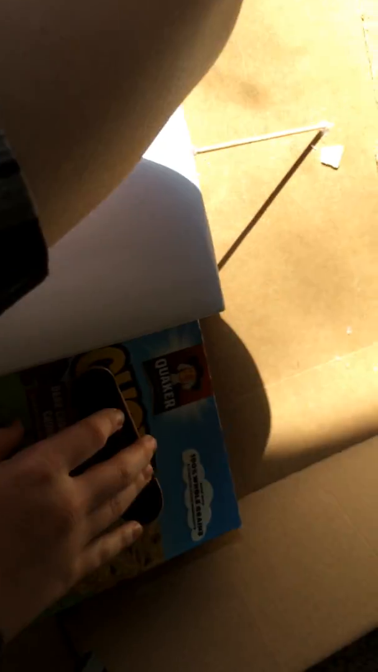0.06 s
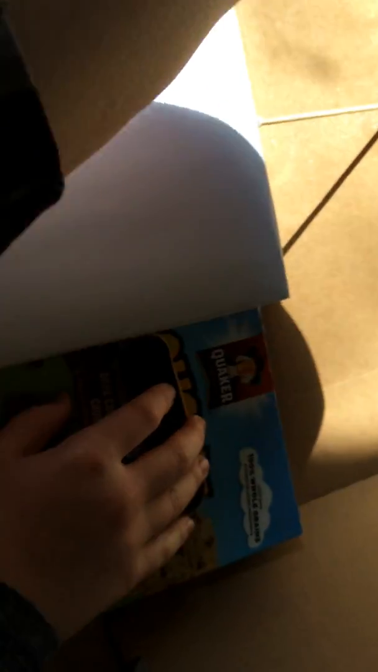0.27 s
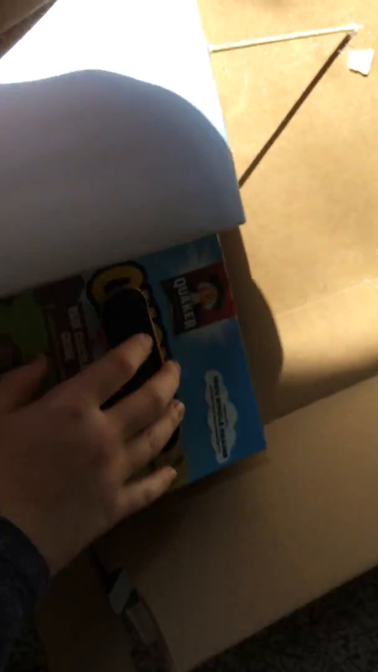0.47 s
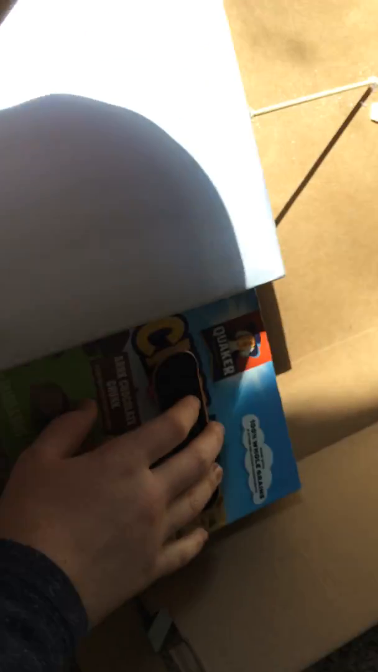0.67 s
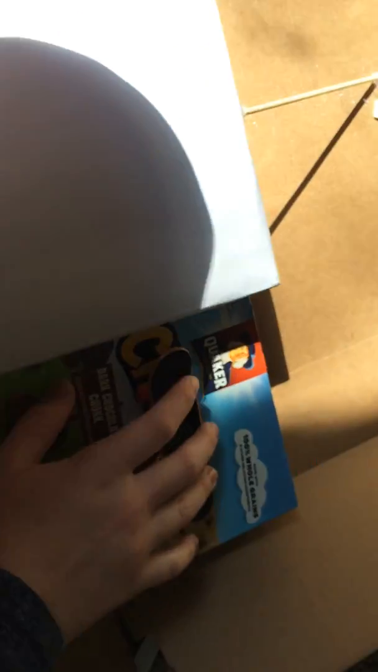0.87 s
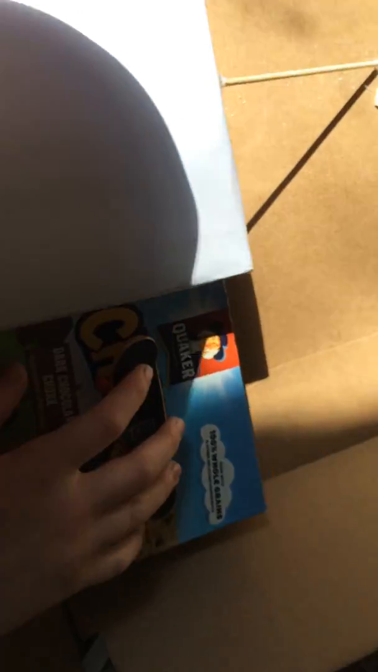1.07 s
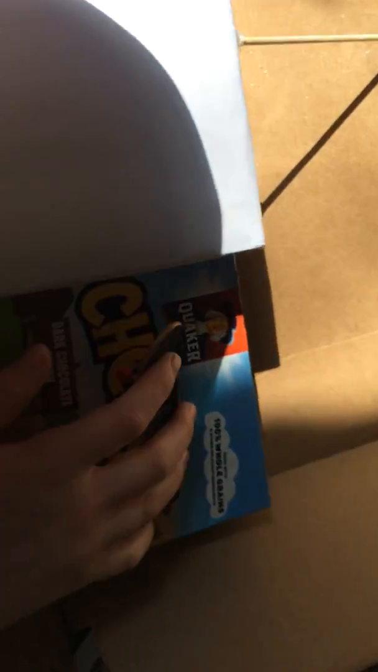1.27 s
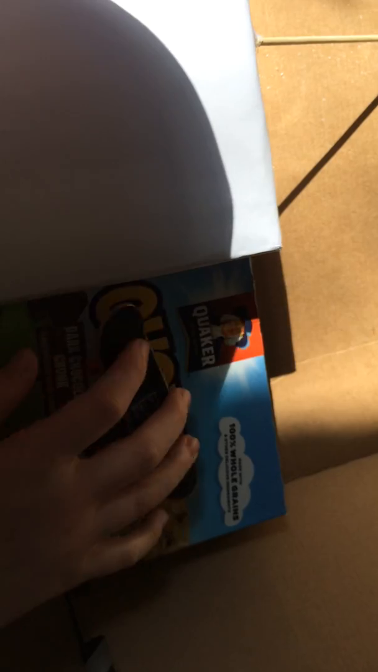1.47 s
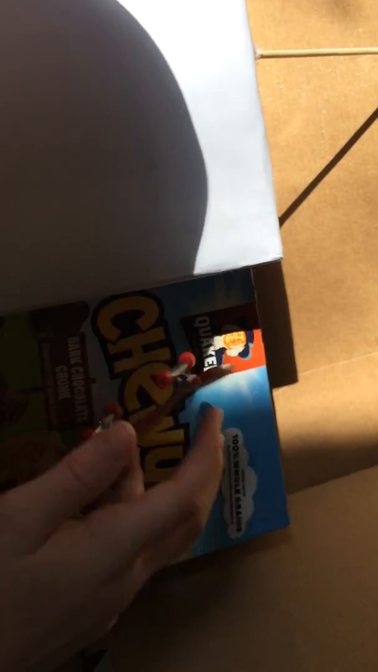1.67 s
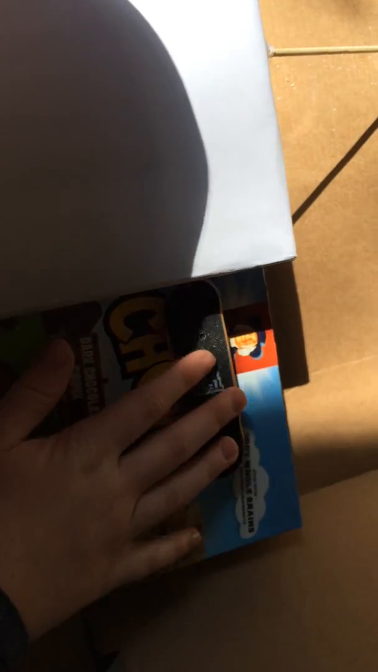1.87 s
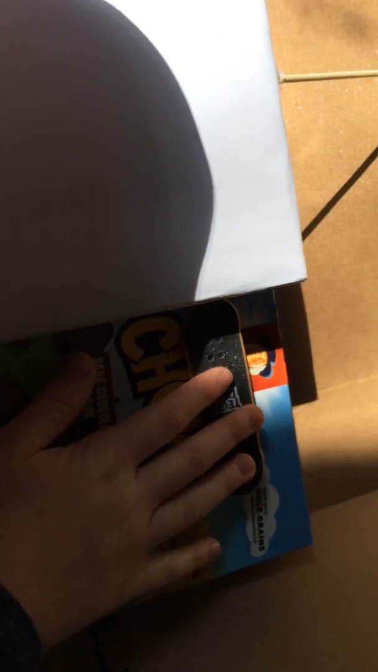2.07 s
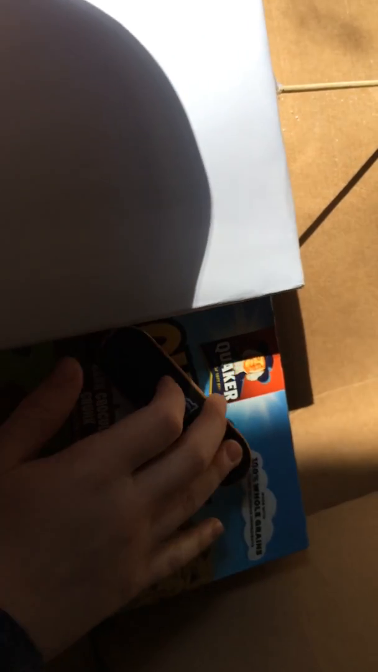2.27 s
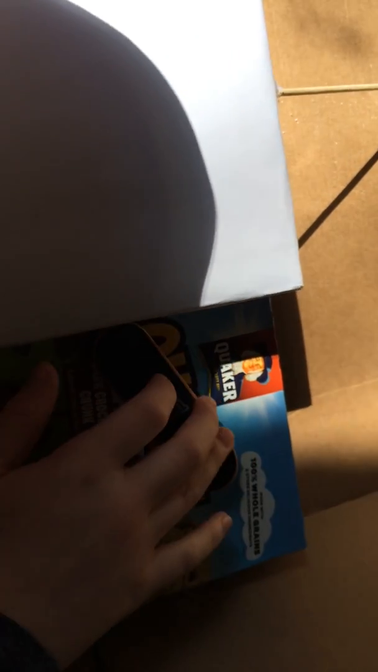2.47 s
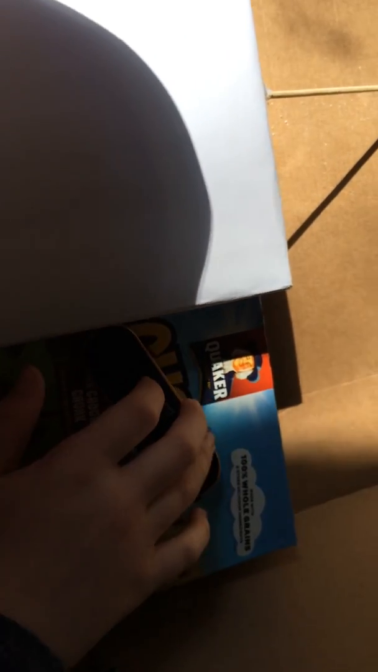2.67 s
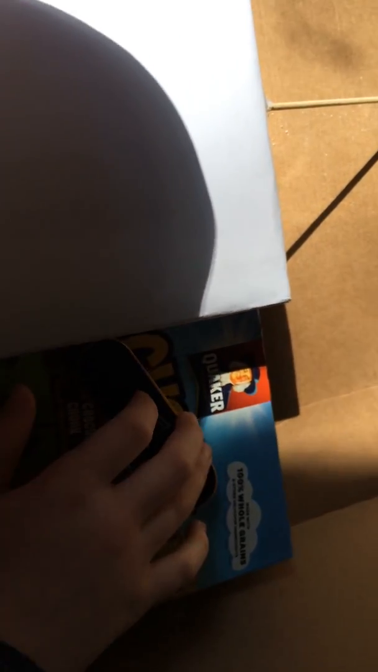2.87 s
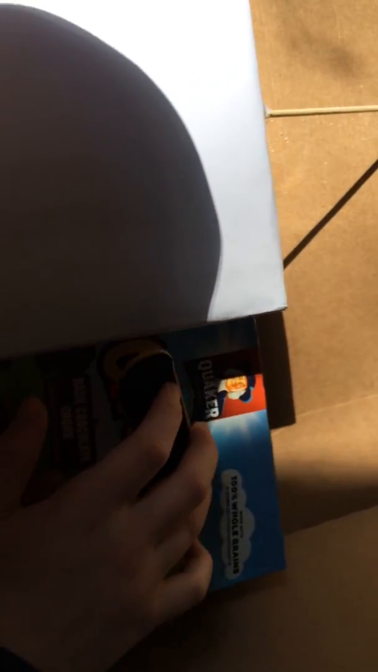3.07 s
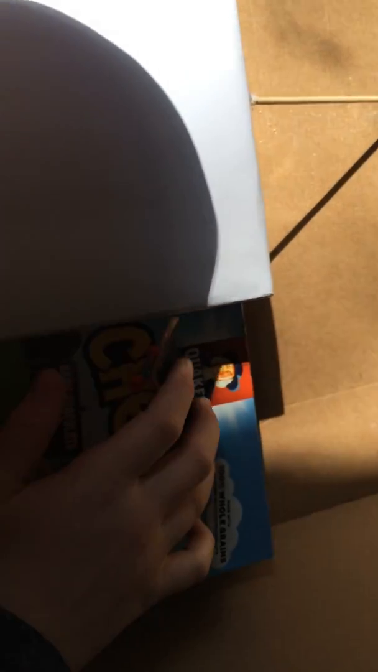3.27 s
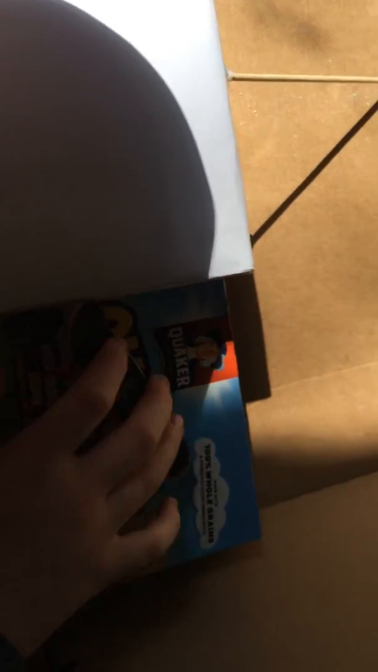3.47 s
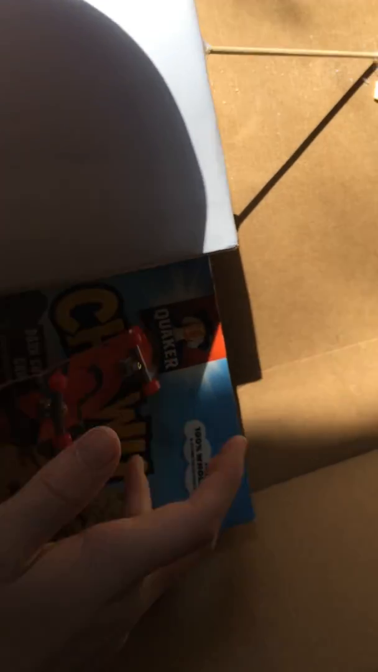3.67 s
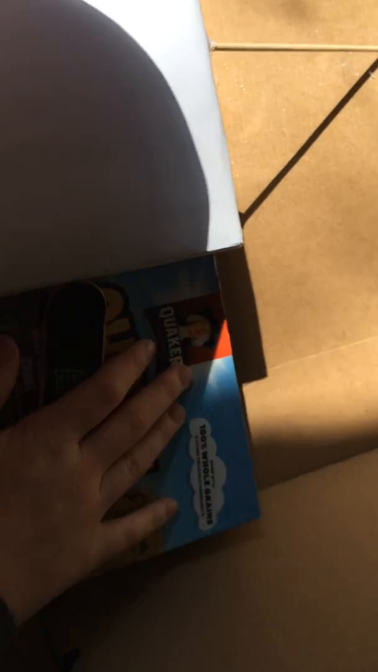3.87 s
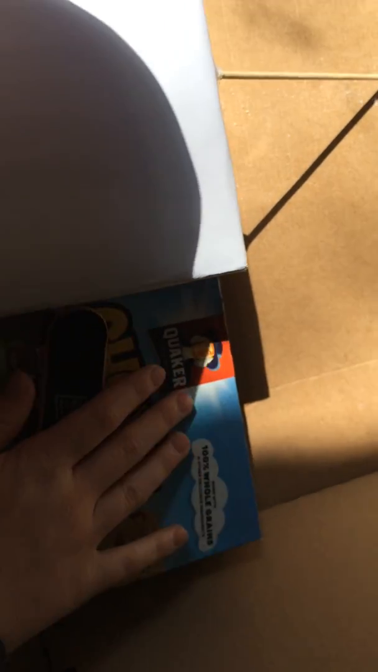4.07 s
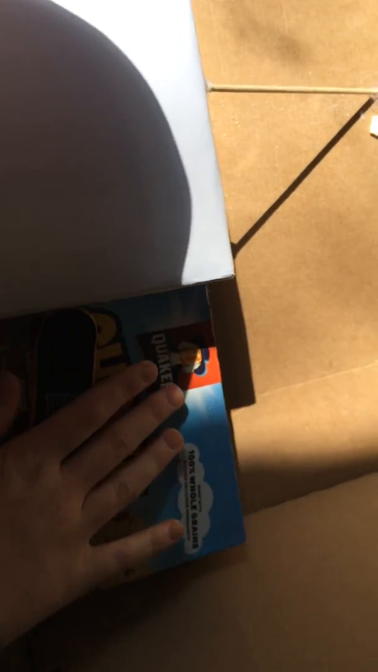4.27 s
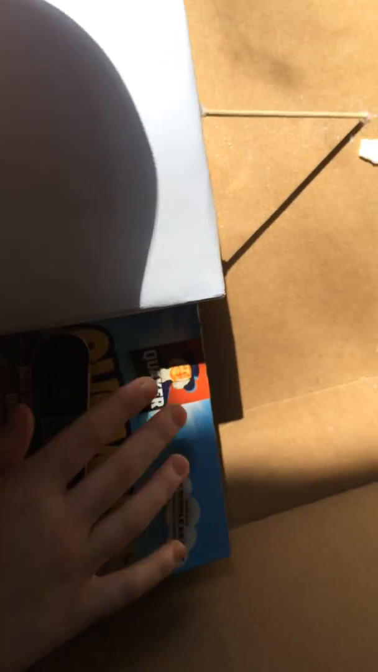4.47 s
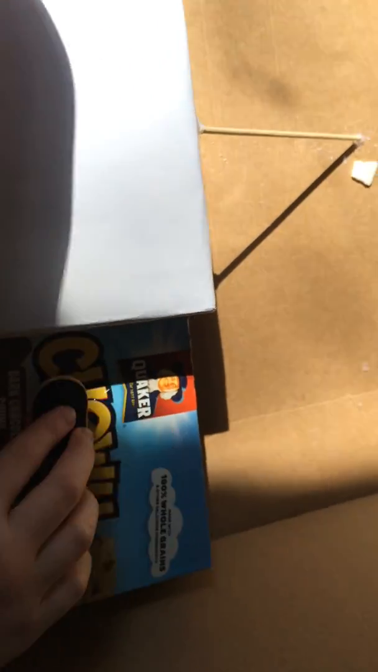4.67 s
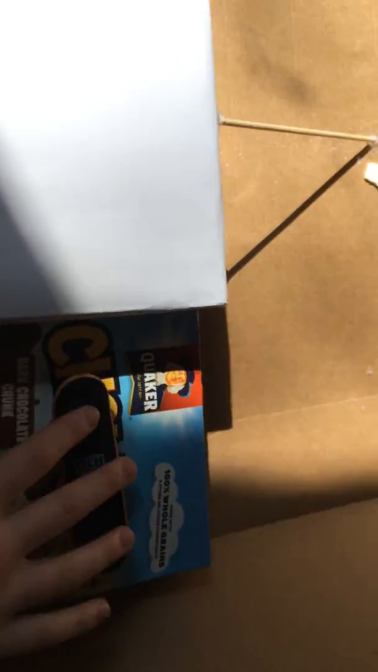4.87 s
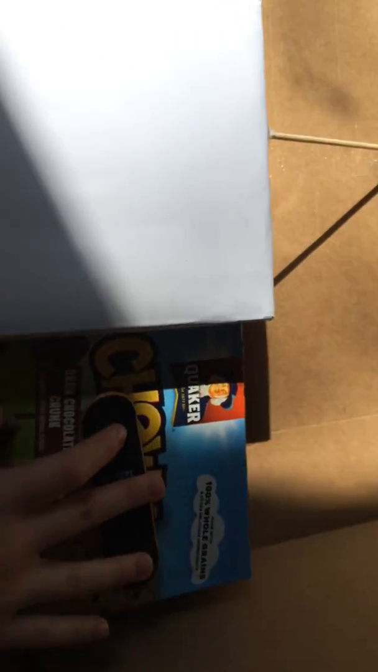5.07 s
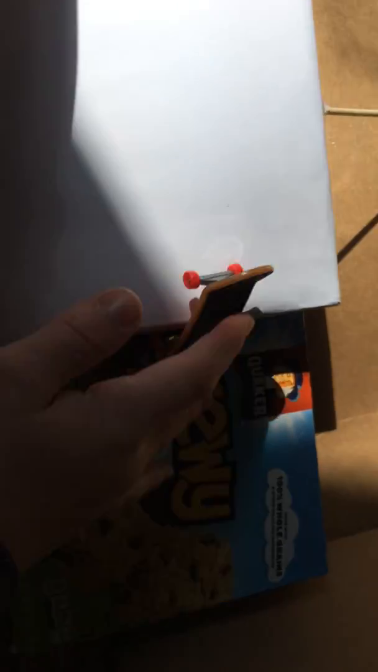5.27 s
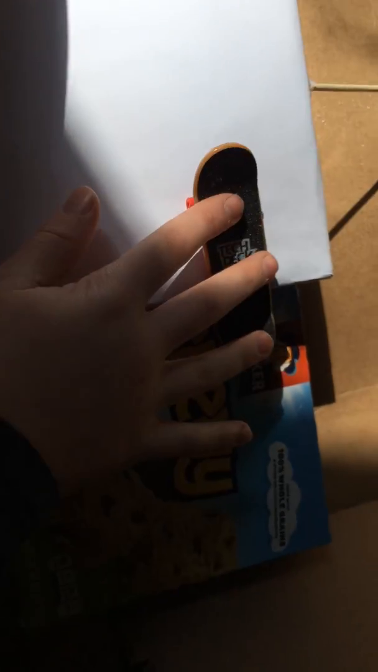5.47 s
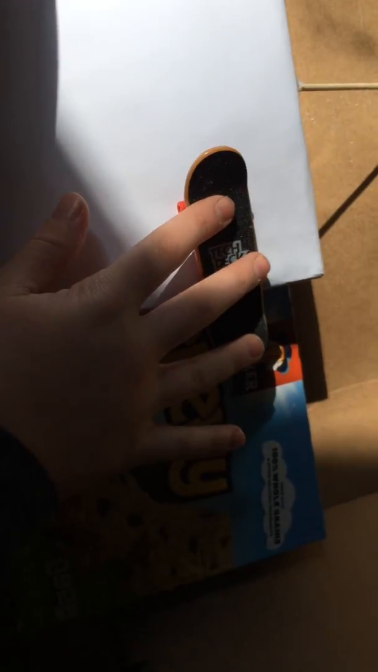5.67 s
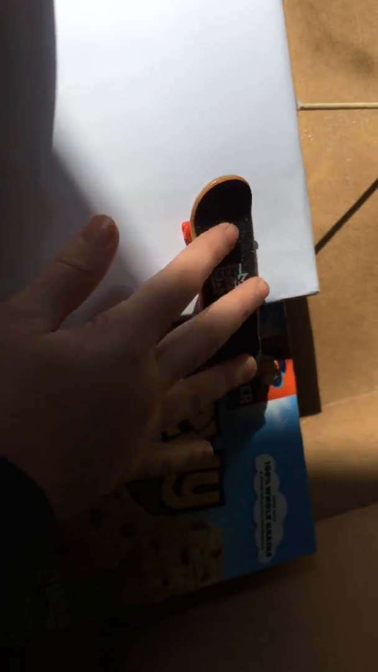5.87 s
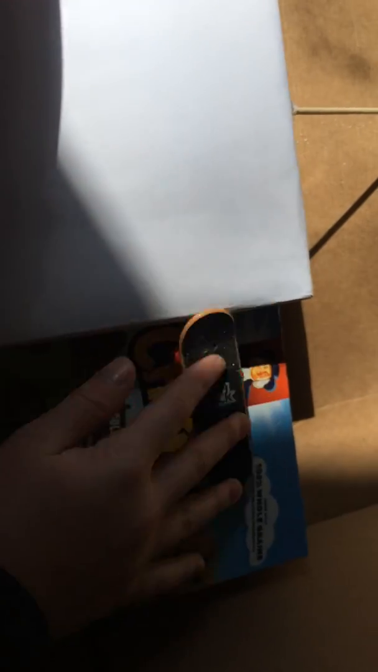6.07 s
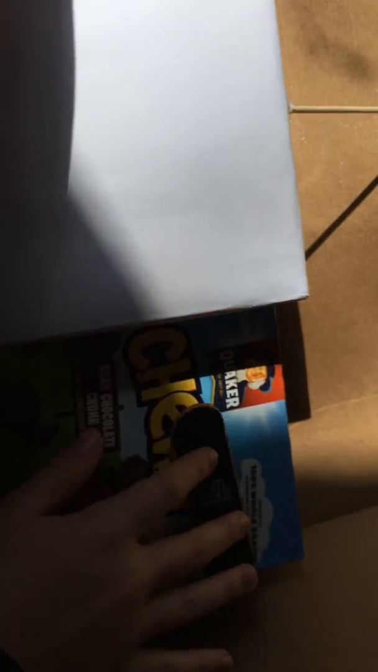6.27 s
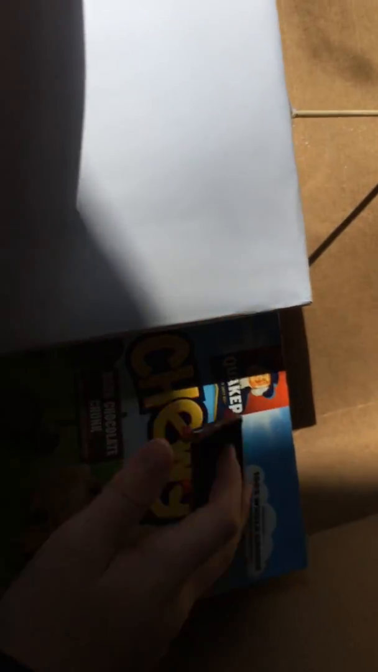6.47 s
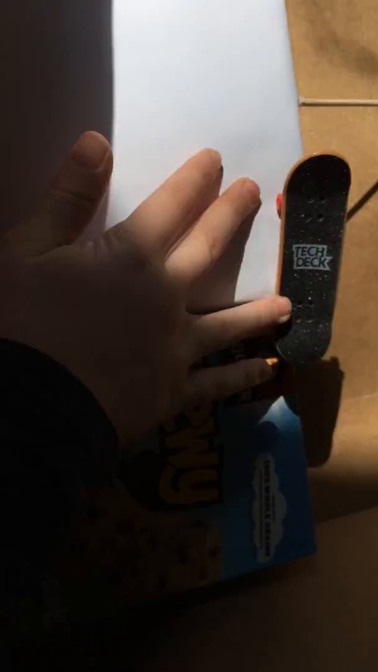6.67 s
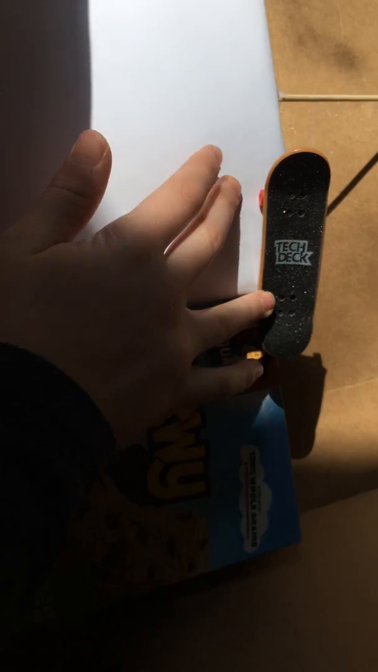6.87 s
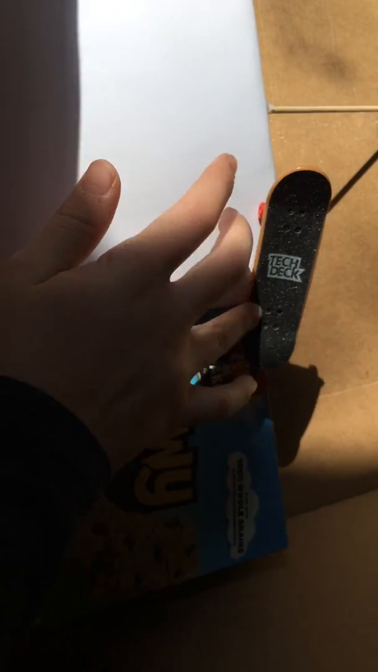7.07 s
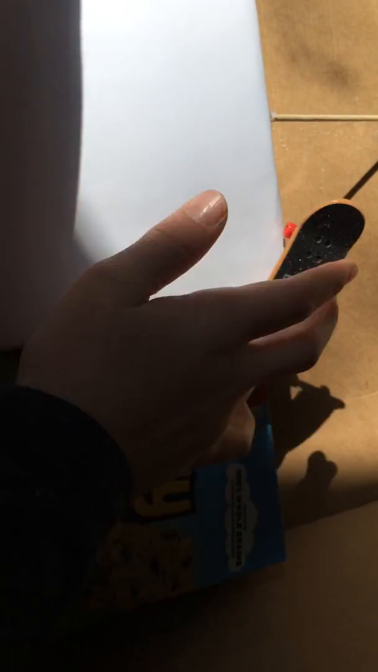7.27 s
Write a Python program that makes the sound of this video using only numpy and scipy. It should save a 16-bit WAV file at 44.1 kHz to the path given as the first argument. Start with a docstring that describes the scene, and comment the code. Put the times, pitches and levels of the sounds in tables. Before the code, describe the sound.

Close, dry phone pickup of a toy skateboard handled on a light hollow box. Three main bouts of knocking: a quick pop and clattering landing, a second similar one, then looser lighter taps with short gritty wheel rolls and a last hard double clack. Between them are near-silent gaps, tiny ticks, soft finger touches, airy sleeve brushing and a faint room hush.

```python
"""A fingerboard is popped, flipped and landed on a flat cardboard box on a table, heard close on a phone.
Each knock is decaying box modes and a flexing spot, with filtered noise and deck modes for the crack.
Between tricks the wheels roll as dense filtered clicks, and a sleeve brushes past as flickering high hiss.
Small ticks, light touches and one soft low bump early on fill in; band-filtered noise tails make
the small quiet room, over a faint steady hush."""
import sys
import numpy as np
from scipy import signal
from scipy.fft import rfft, irfft, next_fast_len
from scipy.io import wavfile
from scipy.ndimage import uniform_filter1d

SR = 44100
rng = np.random.default_rng(int(sys.argv[2]) if len(sys.argv) > 2 else 0)


def generate_wav(sig):
    """Save sig (samples, or channels by samples) to the path in sys.argv[1] as 16-bit PCM at SR."""
    pcm = np.round(np.clip(np.atleast_2d(sig).T, -1, 1) * 32767).astype(np.int16)
    wavfile.write(sys.argv[1], SR, pcm)


N = 322635

# Strokes of the sleeve as the arm moves:
# (time of top speed [s], speeding up [s], slowing down [s], level [dB])
SLEEVE_STROKES = [(.012, 0.023, 0.013, -51.5), (.165, 0.058, 0.086, -51), (.345, 0.02, 0.028, -57.5),
                  (.405, 0.012, 0.038, -52), (.508, 0.032, 0.022, -50.5), (.585, 0.028, 0.033, -48),
                  (.67, .022, 0.048, -52.5), (.8, 0.03, .022, -53), (.865, 0.029, .035, -53),
                  (.975, 0.049, 0.1, -55.5), (2.315, .06, 0.022, -64), (3.57, 0.036, .015, -51.5),
                  (4.565, 0.037, .09, -63.5), (4.91, 0.14, 0.032, -44), (5.025, 0.032, 0.038, -53.5),
                  (5.24, .06, 0.12, -54.5), (5.39, 0.15, 0.09, -51.5), (5.58, 0.053, 0.051, -55),
                  (5.69, 0.034, .05, -68.5), (5.99, 0.14, 0.12, -57), (6.28, 0.09, 0.084, -60.5),
                  (6.5, 0.048, 0.054, -51.5), (6.68, .1, 0.029, -46), (6.797, 0.031, 0.023, -49.5),
                  (6.86, 0.041, 0.024, -53.5), (6.95, 0.064, .04, -60.5), (7.055, 0.039, 0.034, -61),
                  (7.135, .035, 0.034, -63)]
# Deck and wheels striking the box while it is set down, flipped, landed, hopped onto paper and dropped back:
# (time [s], pitch of the struck spot [Hz], thump level [dB], knock level [dB], crack level [dB])
CLACKS = [(0.015, 556, -48, -50, -77), (0.097, 654, -52.5, -50, -66), (1.559, 768, -56, -36.5, -47.5),
          (1.6305, 946, -44.5, -33.5, -39.5), (1.74, 605, -35.5, -34.5, -39.5), (1.758, 434, -48, -43, -56),
          (1.82, 780, -39.5, -33, -50.5), (1.9, 800, -34, -43.5, -40.5), (1.9112, 565, -39, -35.5, -36),
          (1.9152, 664, -25.5, -21.5, -53), (1.934, 595, -39, -25.5, -41), (1.9378, 627, -31.5, -34, -37.5),
          (1.948, 1280, -49.5, -27.5, -51), (1.956, 1087, -48.5, -28, -39.5),
          (3.5822, 780, -44.5, -37, -43.5), (3.6925, 1160, -39, -43, -44.5), (3.7, 426, -39, -30.5, -40),
          (3.7652, 748, -27.5, -25, -40), (3.865, 450, -30.5, -35, -34), (3.8828, 685, -36, -31.5, -38),
          (3.898, 620, -34, -37, -46), (3.907, 620, -40, -30.5, -37), (3.924, 433, -33.5, -33, -34),
          (3.928, 754, -34, -29, -49), (3.94, 477, -47, -35, -45), (3.952, 696, -52, -34, -46.5),
          (5.279, 640, -61.5, -44, -56.5), (5.304, 914, -43, -38, -45.5), (5.3525, 640, -47, -40, -46),
          (5.36, 770, -36.5, -35, -41.5), (5.4175, 560, -42.5, -41, -51), (6.0435, 760, -42, -37.5, -48),
          (6.129, 744, -43, -39, -46.5), (6.1475, 697, -38.5, -32.5, -46.5),
          (6.189, 1016, -44, -30.5, -44.5), (6.559, 756, -40.5, -28, -41), (6.63, 564, -32, -27, -32.5),
          (6.651, 580, -26.5, -31, -36)]
# A wheel left spinning freely after a jolt: (time [s], pitch [Hz], level [dB])
FREE_SPINS = [(1.936, 11300, -51), (6.036, 11400, -54), (6.135, 12200, -42), (6.16, 12300, -52)]
# Pushes of the board over the card:
# (time of top speed [s], speeding up [s], slowing down [s], level [dB], share of sideways slide [0-1])
PUSHES = [(.02, 0.037, 0.14, -60, .05), (.18, 0.099, 0.17, -63.5, 0.18), (.48, .08, 0.27, -62, 0.1),
          (.86, 0.12, 0.13, -69.5, 0.16), (1.62, 0.033, .04, -54.5, 0), (1.73, .04, 0.049, -56.5, .7),
          (2.07, .06, 0.18, -68.5, 1), (2.228, .035, 0.046, -54, 0.35), (2.301, .045, 0.043, -48.5, 0.85),
          (2.66, 0.24, 0.12, -76, .05), (3.58, 0.075, 0.29, -60.5, 0.44), (4.02, .08, 0.066, -59, .7),
          (4.42, 0.072, 0.047, -67.5, 0.1), (4.655, 0.077, 0.072, -54, 0.26), (4.8, 0.044, 0.1, -51, 0.42),
          (5.02, 0.09, 0.051, -60, 0.02), (5.15, 0.066, 0.088, -62.5, 0), (5.305, 0.043, 0.086, -49, .6),
          (6.07, 0.048, 0.15, -51.5, .05), (6.28, 0.17, 0.062, -49, .05), (6.46, 0.076, 0.031, -51.5, 0),
          (6.56, 0.028, 0.022, -51.5, 0.07), (6.8, .12, .25, -72, 0.16)]
# Sharp ticks of the trucks and deck edge: (time [s], pitch [Hz], level [dB])
TICKS = [(0.066, 11600, -55.5), (0.273, 13100, -52.5), (1.09, 10000, -64.5), (1.934, 2600, -43.5),
         (3.926, 3000, -42.5), (4.444, 12100, -55), (5.35, 2580, -48.5), (5.408, 11000, -49),
         (6.027, 5700, -48.5), (6.1156, 5900, -37.5), (6.232, 13000, -59)]
# Light touches of fingers and wheels: (time [s], length [s], pitch [Hz], level [dB])
TOUCHES = [(0.608, 0.063, 2280, -62.5), (0.84, 0.036, 2570, -59), (2.453, 0.054, 900, -62.5),
           (2.575, 0.013, 1390, -68), (2.847, 0.033, 703, -69.5), (3.017, 0.062, 977, -67.5),
           (3.36, 0.019, 700, -67.5), (4.168, 0.043, 1010, -61), (4.437, 0.015, 507, -63),
           (6.815, 0.0088, 935, -62)]
# Modes of the box, before each strike's own scatter: (frequency [Hz], relative level [dB], t60 when rolled on [s])
BOX_MODES = [(136, -8, .08), (193.4, -2.5, 0.088), (261, -1.5, 0.071), (308, -0.5, 0.09), (362.7, 1, .08),
             (426.7, 1, 0.081), (526, 1.5, 0.062), (558, -3.5, .08), (631, -2, 0.12), (705.5, 3, 0.092),
             (768, -11, .1), (842, 1, 0.058), (955, 1, 0.028), (1070, 1, 0.079), (1270, -1.5, 0.064),
             (1340, -9, 0.061), (1425, -7.5, .06), (1770, -15.5, 0.087)]
# Modes of the plastic deck and its metal trucks, before scatter: (frequency [Hz], relative level [dB], t60 [s])
DECK_MODES = [(1830, -2, .03), (2343, 0, .035), (2525, 0, .04), (2740, -2, .035), (3050, -3, .022),
              (3500, -5, .018), (5350, -6, .03)]
# Spectral outlines, of which only the shape matters: (frequency [Hz], relative level [dB])
CRACK_COLOUR = [(900, 3.5), (1500, 7), (2500, -2.5), (3200, -7.5), (4200, -10.5), (5300, -10.5),
                (7000, -11.5), (10000, -24.5)]  # hard plastic on card, before each contact's own variation
RATTLE_COLOUR = [(4000, -8), (6000, -3), (7400, -4.5), (8800, -3), (10400, 0.5), (11200, 0), (11900, 3.5),
                 (13200, -3), (14300, -5), (15500, -10.5)]  # loose wheels on axles, before each contact's own variation
WHEEL_COLOUR = [(100, -20), (250, -7), (450, -0.5), (700, 2), (1100, -7.5), (1600, -10.5), (2300, -19),
                (3500, -26), (6000, -30.5), (15000, -32.5)]  # wheels rolling on card
SLIDE_COLOUR = [(250, -23), (600, 0), (850, -3.5), (1100, 0), (1400, -5.5), (1850, -13), (2250, -7),
                (2900, -20.5), (6000, -23), (15000, -29)]  # sideways rub on card
CLOTH_COLOUR = [(1500, -29.5), (3000, -16.5), (4500, -18), (5400, -5), (6600, -17), (7500, -10),
                (8100, -8.5), (8800, -6.5), (10200, -1), (12000, 0.5), (13500, -2), (15600, -1.5)]  # sleeve fibres
HUSH_COLOUR = [(15, -27.5), (25, -4.5), (97, -8.5), (161, -6.5), (206, -7.5), (301, -12.5), (363, -7),
               (416, -12.5), (796, -19.5), (2000, -24.5), (2840, -26.5), (5280, -27.5), (14800, -26.5),
               (16000, -32)]  # the quiet room
# The room's ring: (band centre [Hz], t60 [s], relative level [dB])
ROOM_BANDS = [(200, 0.31, -5.5), (390, 0.47, -12), (800, 0.19, -12), (1600, 0.39, -12.5),
              (3340, .34, -10.5), (6400, 0.37, -16), (12800, 0.14, -16)]

AIR_MODE_HZ = 460  # box modes up to here belong to the air inside, those above to the card
RING_TIME = np.arange(SR // 4) / SR  # seconds
ATTACK = int(.008 * SR)  # samples over which a strike's level is set
SNAP_T60, SKIN_T60 = .012, .15  # seconds: a contact's snap, the card's skin
CONTACT_SPREAD_DB = 3.5  # how far a contact's colour strays either way
RATTLE_DB, SPIN_DB = -1.5, -15  # axle rattle and wheel spin, relative to the crack
TABLE_DB = -26.5  # table thud, relative to the thump
SWELL_DB, SWELL_CURVE = 9, 1.7  # drop after one speeding-up or slowing-down time; roundness of the top


def undb(db):
    """Decibels to gain."""
    return 10 ** (np.asarray(db) / 20)


def unit(x):
    """Scale to rms 1."""
    return x / np.sqrt(np.mean(x ** 2))


def blow(x, db):
    """Scale a ring so that the rms of its attack has the given level."""
    return x * undb(db) / np.sqrt(np.mean(x[:ATTACK] ** 2))


def decay(t, t60):
    """Exponential decay by 60 dB in t60 seconds."""
    return np.exp(-np.log(1000) * t / t60)


def fade(t60):
    """Exponential decay over the length of a ring."""
    return decay(RING_TIME, t60)


def colour(x, points):
    """Causal minimum-phase filter with the given (Hz, dB) outline."""
    size = next_fast_len(len(x) + SR // 8)
    size += size % 2
    hz, db = np.transpose(points)
    bins_hz = np.arange(size // 2 + 1) * SR / size
    outline_db = np.interp(np.log(bins_hz + 1), np.log(hz), db)
    cepstrum = irfft(np.log(undb(outline_db)), size)
    # folding the cepstrum forward in time makes the filter causal
    cepstrum[1:size // 2] *= 2
    cepstrum[size // 2 + 1:] = 0
    response = np.exp(rfft(cepstrum))
    return irfft(rfft(x, size) * response, size)[:len(x)]


def vary(points, spread_db):
    """Every contact point favours other parts of a spectrum."""
    hz, db = np.transpose(points)
    return np.c_[hz, db + spread_db * rng.uniform(-1, 1, len(hz))]


def resonate(x, hz, q):
    """One broad resonance."""
    b, a = signal.iirpeak(min(hz, SR / 3), max(q, hz / (SR / 4)), fs=SR)
    return signal.lfilter(b, a, x)


def walk(rate):
    """Smooth random wander, drawn anew `rate` times a second, with a spread near 1."""
    k = int(SR / rate)
    steps = np.repeat(rng.standard_normal(N // k + 1), k)
    return unit(uniform_filter1d(steps, k)[:N])


def grains(n, rate, spread_db):
    """Random clicks of uneven size, about `rate` a second."""
    size = undb(spread_db * np.clip(rng.standard_normal(n), -2, 2))
    hits = rng.random(n) < rate / SR
    return unit(hits * rng.choice([-1, 1], n) * size)


def add(track, s, sound):
    """Mix a sound into the track at time s."""
    i = max(int(s * SR), 0)
    track[i:i + len(sound)] += sound[:N - i]


def swell(s, rise_s, fall_s, db):
    """Gain of one hand movement: it speeds up, peaks at time s and slows down."""
    t = np.arange(N) / SR - s
    away = np.minimum(np.maximum(-t / rise_s, t / fall_s), 10)
    return undb(db - SWELL_DB * away ** SWELL_CURVE)


def room_hush(level_db=-69):
    """The quiet room's steady hush: noise with a fixed spectrum."""
    return unit(colour(rng.standard_normal(N), HUSH_COLOUR)) * undb(level_db)


def brushing(flutter_db=1, snag_db=-11):
    """Fibres catch and slip: a fine high hiss, dotted with tiny snags, swells with each stroke of the arm."""
    fibres = rng.standard_normal(N) * undb(flutter_db * walk(rate=26))
    snags = grains(N, rate=40, spread_db=4)
    arm = np.sqrt(sum(swell(*stroke) ** 2 for stroke in SLEEVE_STROKES))
    return unit(colour(fibres + undb(snag_db) * snags, CLOTH_COLOUR)) * arm


def box_ring(spot_hz, thump_db, knock_db, spot_t60=0.031, spot_db=1, scatter=.02,
             t60_share=0.82, swell_s=0.0016, edge_s=.008, edge_db=-7):
    """The struck spot flexes for a few cycles and sets the whole box ringing; each spot favours other modes."""
    hz, db, t60 = np.transpose(BOX_MODES)
    hz = hz * (1 + scatter * rng.standard_normal(len(hz)))  # the hand's weight retunes the card
    gain = undb(db) * rng.choice([-1, 1], len(hz)) * rng.uniform(.5, 1, len(hz))
    waves = np.cos(2 * np.pi * hz[:, None] * RING_TIME)
    modes = gain[:, None] * waves * fade(t60_share * t60[:, None])  # a strike rings shorter than rolling
    spot = np.sin(2 * np.pi * spot_hz * RING_TIME) * fade(spot_t60)
    edge_delay = int(edge_s * SR * rng.uniform(.7, 1.2))
    spot = spot + undb(edge_db) * np.roll(spot, edge_delay)  # the bend returns from the box's edge
    card = resonate(modes[hz > AIR_MODE_HZ].sum(0), spot_hz, q=0.51)
    panel = blow(card, 0) + blow(spot, spot_db)
    # the air inside takes a moment to move
    hollow = modes[hz <= AIR_MODE_HZ].sum(0) * (1 - np.exp(-RING_TIME / swell_s))
    no_deep_bass = signal.butter(2, 110, "high", fs=SR, output="sos")  # a small box radiates none
    return signal.sosfilt(no_deep_bass, blow(panel, knock_db) + blow(hollow, thump_db))


def table_thud(db, hz=68, t60=.06):
    """Landings press through the box and nudge the table beneath: a short low sine with a soft onset."""
    return undb(db) * np.sin(2 * np.pi * hz * RING_TIME) * fade(t60) * (1 - fade(.02))


def contact(crack_db, rattle_db, skin_db=-13, axle_t60=0.13, axle_db=-11, deck_db=-4):
    """Hard plastic snaps on the card's skin and the deck rings; loose wheels chatter on their axles."""
    n = len(RING_TIME)
    hz, db, t60 = np.transpose(DECK_MODES)
    hz = hz * (1 + .025 * rng.standard_normal(len(hz)))  # fingers load the deck differently each time
    gain = undb(db) * rng.uniform(-1, 1, len(hz))
    waves = np.sin(2 * np.pi * hz[:, None] * RING_TIME)
    deck = (gain[:, None] * waves * fade(t60[:, None])).sum(0)
    snap = rng.standard_normal(n) * (fade(SNAP_T60) + undb(skin_db) * fade(SKIN_T60))
    snap = colour(snap, vary(CRACK_COLOUR, CONTACT_SPREAD_DB))
    crack = blow(snap, 0) + blow(deck, deck_db)
    rattle = grains(n, rate=6900, spread_db=6.5) * (fade(SNAP_T60) + undb(axle_db) * fade(axle_t60))
    rattle = colour(rattle, vary(RATTLE_COLOUR, CONTACT_SPREAD_DB))
    return blow(crack, crack_db) + blow(rattle, rattle_db)


def wheel_spin(db, hz=11800, q=16, t60=0.066):
    """A jolt sets a wheel spinning, and it sings thinly on its axle: fading clicks through a resonance."""
    chatter = grains(len(RING_TIME), rate=3000, spread_db=4) * fade(t60) * (1 - fade(.02))
    pitch = hz * (1 + .015 * rng.standard_normal())
    return blow(resonate(chatter, pitch, q), db)


def clacks():
    """Every pop, flip and landing: the harder the crack, the more the axles rattle and the wheels spin."""
    out = np.zeros(N)
    for s, spot_hz, thump_db, knock_db, crack_db in CLACKS:
        add(out, s, box_ring(spot_hz, thump_db, knock_db) + table_thud(thump_db + TABLE_DB))
        add(out, s, contact(crack_db, crack_db + RATTLE_DB) + wheel_spin(crack_db + SPIN_DB))
    for s, hz, db in FREE_SPINS:
        add(out, s, wheel_spin(db, hz, t60=0.076))
    return out


def rolling(ring_db=-6):
    """Wheels run over the grain of the card and its ribs ring the box; sliding sideways gives a higher rub."""
    judder = undb(2.2 * walk(rate=110) + 1.5 * walk(rate=30))
    grain = grains(N, rate=5000, spread_db=3) * judder
    ribs = grains(N, rate=250, spread_db=3) * judder
    ring = np.zeros(len(RING_TIME))
    for hz, db, t60 in BOX_MODES:
        ring += undb(db) * rng.choice([-1, 1]) * np.sin(2 * np.pi * hz * RING_TIME) * fade(t60)
    body = unit(colour(signal.fftconvolve(ribs, ring)[:N], WHEEL_COLOUR))
    roll = unit(colour(grain, WHEEL_COLOUR)) + undb(ring_db) * body
    rub = unit(colour(grains(N, rate=2500, spread_db=2) * judder, SLIDE_COLOUR))
    power = np.array([swell(s, rise_s, fall_s, db) ** 2 for s, rise_s, fall_s, db, _ in PUSHES])
    slide = np.clip(np.array(PUSHES)[:, -1], 0, 1)
    roll_gain = np.sqrt((1 - slide) @ power)
    rub_gain = np.sqrt(slide @ power)
    return roll_gain * roll + rub_gain * rub


def ticks(t60=0.0025, q=1.9, ring_db=-20, ring_t60=0.23):
    """Tiny hard parts click without moving the box: resonant noise with a brief snap and a faint ring."""
    out = np.zeros(N)
    for s, hz, db in TICKS:
        click = rng.standard_normal(len(RING_TIME)) * (fade(t60) + undb(ring_db) * fade(ring_t60))
        add(out, s, blow(resonate(click, hz, q), db))
    return out


def bump(start_s=.597, hz=39, sway_db=-17, rise_s=.034, t60=0.29, after_hz=46, after_db=-39, after_t60=0.84,
         nudge_hz=220, nudge_db=-50, nudge_t60=0.2):
    """A soft, dull nudge makes something heavy sway for a few low cycles."""
    t = np.arange(SR) / SR
    sway = undb(sway_db) * np.sin(2 * np.pi * hz * t) * decay(t, t60)
    after = undb(after_db) * np.sin(2 * np.pi * after_hz * t) * decay(t, after_t60)
    onset = 1 - np.exp(-(t / rise_s) ** 2)
    push = rng.standard_normal(len(RING_TIME)) * fade(nudge_t60)
    nudge = resonate(resonate(push, nudge_hz, q=1), nudge_hz, q=1)
    out = np.zeros(N)
    add(out, start_s, (sway + after) * onset)
    add(out, start_s, blow(nudge, nudge_db))
    return out


def touches(q_per_khz=0.81):
    """Soft contacts: a short swell of friction around one pitch."""
    out = np.zeros(N)
    for s, length, hz, db in TOUCHES:
        n = int(length * SR)
        friction = grains(len(RING_TIME), rate=6000, spread_db=3)
        rub = resonate(colour(friction, SLIDE_COLOUR), hz, q_per_khz * hz / 1000)
        add(out, s, unit(rub[:n] * np.hanning(n)) * undb(db))
    return out


def room(x, build_s=0.0038, wet_db=-1):
    """Walls and furniture return a short diffuse tail: noise in bands, each with its own decay."""
    t = np.arange(SR // 2) / SR
    tail = np.zeros(len(t))
    for hz, t60, db in ROOM_BANDS:
        lo, hi = hz / np.sqrt(2), min(hz * np.sqrt(2), SR / 2 - 1000)
        octave = signal.butter(2, [lo, hi], "band", fs=SR, output="sos")
        band = signal.sosfilt(octave, rng.standard_normal(len(t)))
        band = band * decay(t, t60) * (1 - np.exp(-(t / build_s) ** 2))
        # energy in proportion to bandwidth, so that levels compare across bands
        tail += undb(db) * band * np.sqrt(2 * (hi - lo) / SR / np.sum(band ** 2))
    return x + undb(wet_db) * signal.fftconvolve(x, tail)[:N]


def scene():
    """Board, box and sleeve ring in the room; the bump and the faint hush are added without its tail."""
    hush = room_hush()
    close_sounds = clacks() + ticks() + touches() + rolling() + brushing()
    return (room(close_sounds) + bump() + hush)[None]


def record(dry, top_hz=16000):
    """The phone cuts the very top with a steep low-pass."""
    low_pass = signal.ellip(8, .2, 60, top_hz, fs=SR, output="sos")
    return signal.sosfilt(low_pass, dry)


dry = scene()
out = record(dry)
generate_wav(out)
```